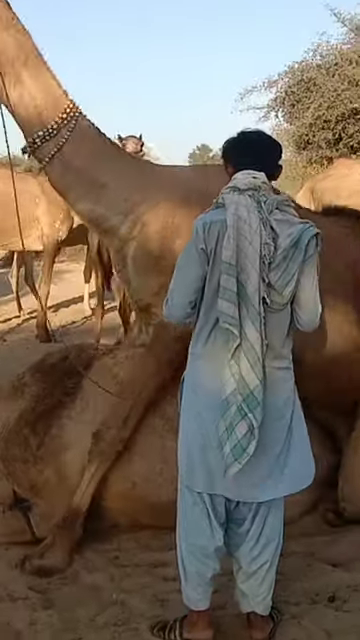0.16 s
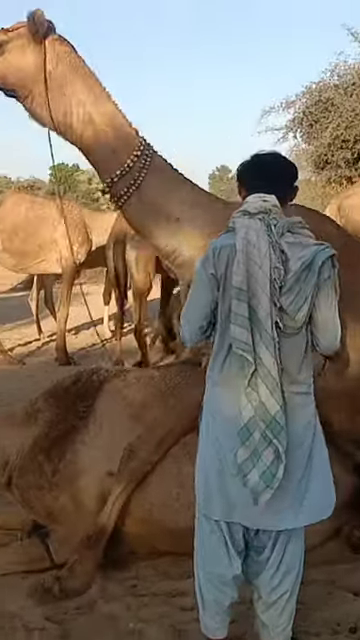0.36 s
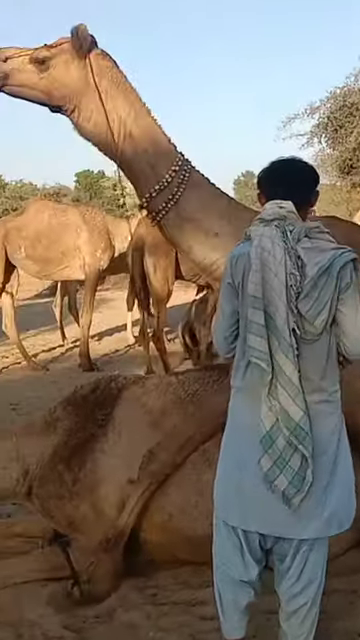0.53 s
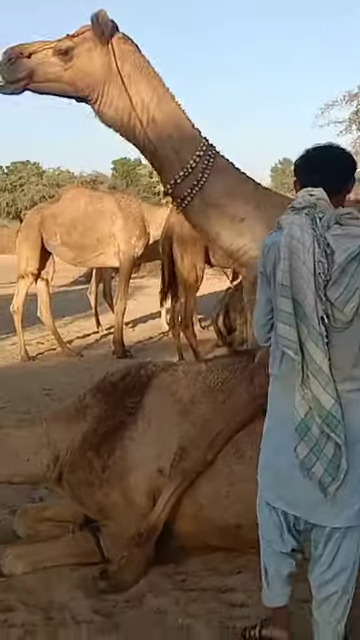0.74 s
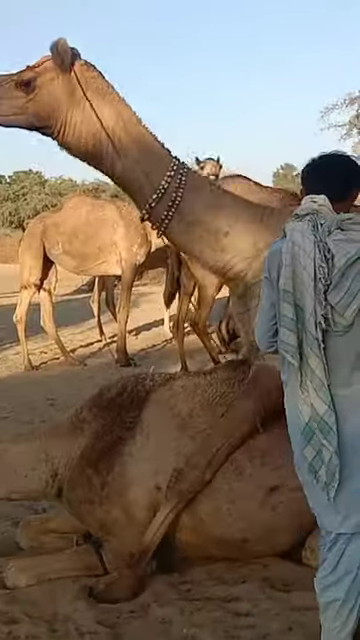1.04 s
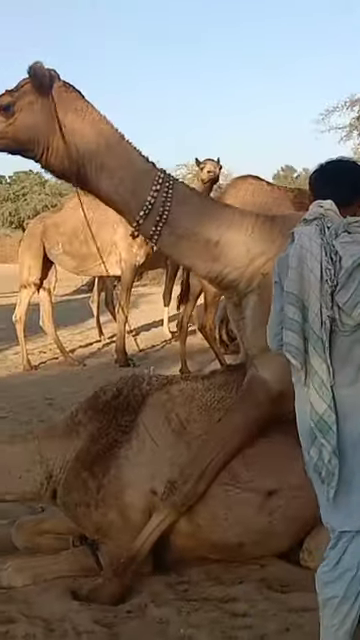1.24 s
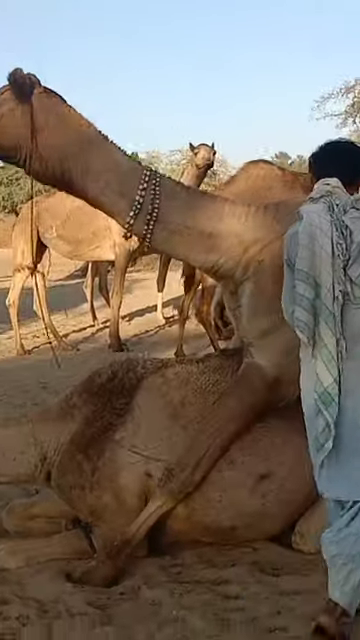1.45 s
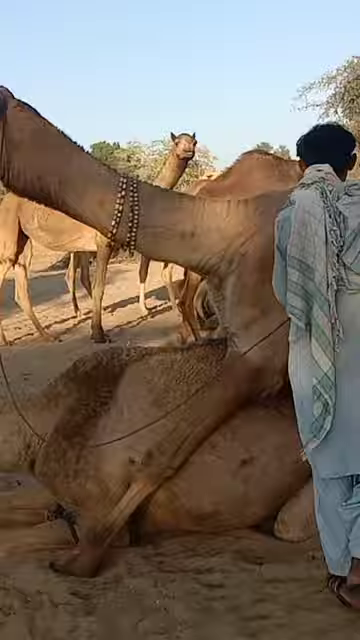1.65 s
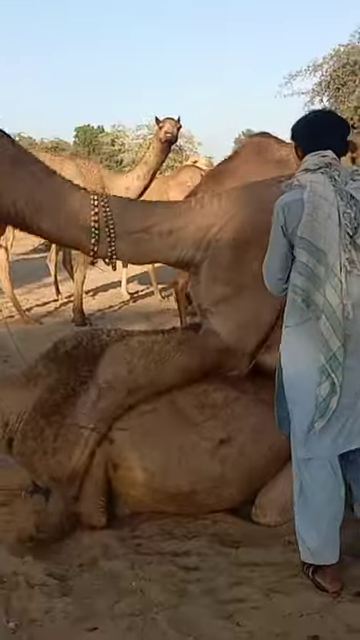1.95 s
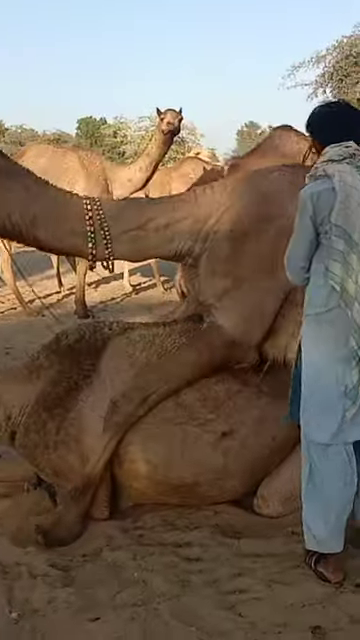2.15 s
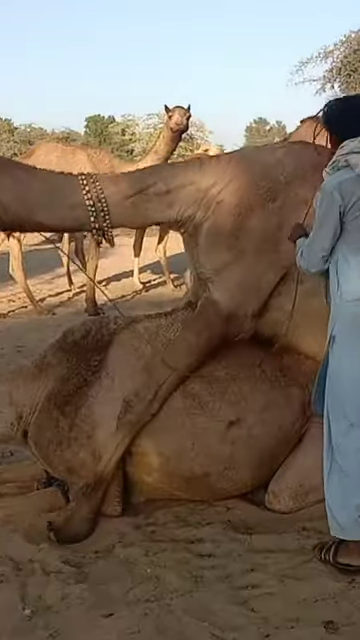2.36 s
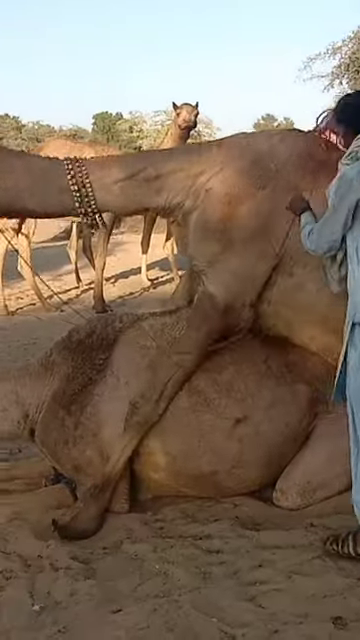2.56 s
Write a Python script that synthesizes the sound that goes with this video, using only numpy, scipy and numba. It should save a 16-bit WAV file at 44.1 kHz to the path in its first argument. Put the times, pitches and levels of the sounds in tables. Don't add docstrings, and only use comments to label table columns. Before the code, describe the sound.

One long, hoarse camel groan, low and unevenly pulsing, grows slower and raspier before cutting off, with small bead knocks near the end. Close phone pickup outdoors, almost silent background, hardly any echo.

```python
import sys
import numpy as np
from scipy import signal
from scipy.io import wavfile
from scipy.ndimage import uniform_filter1d, minimum_filter1d
from numba import njit

SR = 44100
rng = np.random.default_rng(int(sys.argv[2]) if len(sys.argv) > 2 else 0)


def how_loud(loudness_db):
    steps = np.asarray(loudness_db, float) / 20
    return 10 ** steps


def file_out(sig):
    cols = np.atleast_2d(sig).T
    lim = np.clip(cols, -1, 1)
    pcm = np.round(lim * 32767).astype(np.int16)
    wavfile.write(sys.argv[1], SR, pcm)


N = 119070

# start_s, level_db, pulse_hz, first_hz, second_hz, third_hz (throat resonances)
BELLOW_PATH = [(0.195, -40, 106, 242, 866, 1610), (0.21, -32, 105, 247, 854, 1550),
               (0.33, -18, 108, 282, 936, 1520), (0.57, -20, 106, 301, 958, 1610),
               (0.81, -17, 104, 305, 936, 1630), (0.86, -25, 104, 278, 924, 1560),
               (0.92, -19, 107, 293, 917, 1490), (1.03, -18, 93.2, 278, 945, 1430),
               (1.19, -20, 92.7, 267, 953, 1610), (1.29, -21, 109, 268, 922, 1530),
               (1.54, -18, 106, 283, 908, 1550), (1.64, -20, 97.1, 277, 919, 1510),
               (1.88, -18, 97.0, 276, 913, 1480), (2.03, -20, 86.5, 272, 886, 1460),
               (2.22, -17, 93.3, 284, 941, 1500), (2.4, -20, 87.6, 274, 874, 1500),
               (2.44, -26, 86.8, 252, 800, 1450), (2.53, -72, 86.5, 252, 897, 1430)]
BELLOW_END_S = 2.445


@njit
def svf(x, hz, width):
    y, band, low = np.empty(len(x)), 0., 0.
    for i in range(len(x)):
        g, k = np.tan(np.pi * hz[i] / SR), width / hz[i]
        v = (band + g * (x[i] - low)) / (1 + g * (g + k))
        band, low, y[i] = 2 * v - band, low + 2 * g * v, k * v
    return y


def steep(x, hz, width, count=2):
    for _ in range(count):
        x = svf(x + 1e-18, hz + np.zeros(N), 1. * width)
    return x


def unit(x):
    return x / np.sqrt(np.mean(x ** 2))


def smooth(x, size):
    return uniform_filter1d(uniform_filter1d(x, size), size)


def walk(rate_hz):
    hold = int(SR / rate_hz)
    return 1.3 * smooth(rng.standard_normal(400)[np.arange(N) // hold], hold)


def clicks(times, sizes):
    at = np.asarray(times) * SR
    i = at.astype(int)
    early = np.bincount(i, sizes * (1 - at + i), N + 1)[:N]
    late = np.bincount(i + 1, sizes * (at - i), N + 1)[:N]
    return early + late


def follow(t, table):
    table = np.array(table)
    return [np.interp(t, table[:, 0], column) for column in table.T[1:]]


def floor(t):
    # band_hz, level_db (per Hz)
    air_colour = [
        (24, -49),
        (40, -15.5),
        (186, 3.5),
        (346, -14.5),
        (866, 1.5),
        (3220, -7),
        (4930, -14),
        (12300, -23),
        (15000, -25),
    ]
    colour_hz, colour_db = np.transpose(air_colour)
    air = 0
    for hz in 60 * 2 ** np.arange(0, 8, .5):
        db = np.interp(np.log(hz), np.log(colour_hz), colour_db) + 3.5 * walk(20)
        air = air + how_loud(db) * steep(rng.standard_normal(N), hz, hz / 3)
    hum = unit(steep(rng.standard_normal(N), 75, 40)) * how_loud(-61) * (t < .3)
    return unit(air) * how_loud(-77.5) + hum


def beads(t):
    # start_s, peak_db, pitch_hz
    tinkles = [
        (.04, -66, 2800),
        (.02, -68, 1260),
        (1.32, -67, 4750),
        (1.615, -46, 3300),
        (1.615, -44, 4600),
        (2.34, -40, 4650),
        (2.432, -35.5, 3100),
        (2.463, -42.5, 2800),
        (2.5, -61, 2800),
        (2.53, -67.5, 1380),
    ]
    t60_s, attack_s = .055, .004
    out = 0
    for start_s, peak_db, hz in tinkles:
        age = np.maximum(t - start_s, 0)
        envelope = how_loud(peak_db - 60 * age / t60_s) * (1 - np.exp(-age / attack_s))
        out = out + envelope * np.sin(2 * np.pi * hz * age)
    return out


def rumble():
    # start_s, peak_db
    pulses = [
        (0.064, -62),
        (0.086, -59),
        (0.111, -51.5),
        (0.136, -42.5),
        (0.164, -52),
        (0.185, -39.5),
    ]
    start_s, peak_db = np.transpose(pulses)
    muffled = steep(clicks(start_s, how_loud(peak_db)), 240, 140, count=4)
    return muffled * how_loud(peak_db.max()) / np.abs(muffled).max()


def folds():
    # start_s, peak_db
    early_slaps = [(0.211, -24), (0.23, -21), (0.252, -16), (0.27, -13), (0.288, -11), (0.306, -11),
                   (0.325, -6), (0.353, -6), (0.37, -6), (0.39, -7), (0.425, -4), (0.454, -8), (0.475, -9),
                   (0.502, -13), (0.502, -7), (0.521, -11), (0.539, -9), (0.568, -11), (0.578, -10),
                   (0.586, -8), (0.606, -7), (0.624, -9), (0.661, -7), (0.672, -7), (0.7, -8), (0.738, -10),
                   (0.756, -7), (0.768, -7), (0.775, -5), (0.795, -5), (0.814, -6), (0.854, -15),
                   (0.885, -8), (0.912, -14), (0.92, -12), (0.947, -4), (0.986, -7), (1.007, -8),
                   (1.028, -8), (1.049, -12), (1.06, -9), (1.071, -8), (1.125, -12), (1.138, -9),
                   (1.172, -10), (1.182, -11), (1.207, -11), (1.214, -10), (1.224, -11), (1.236, -10),
                   (1.263, -10), (1.275, -10), (1.298, -6), (1.324, -11), (1.352, -12), (1.38, -5)]
    # start_s, peak_db
    late_slaps = [(1.354, -14), (1.38, -5), (1.408, -6), (1.443, -7), (1.455, -7), (1.476, -8), (1.493, -6),
                  (1.514, -6), (1.541, -6), (1.587, -8), (1.605, -9), (1.627, -9), (1.627, -7),
                  (1.659, -10), (1.659, -8), (1.692, -4), (1.71, -7), (1.738, -10), (1.762, -8),
                  (1.781, -5), (1.803, -10), (1.834, -19), (1.834, -5), (1.852, -8), (1.875, -7),
                  (1.893, -5), (1.923, -9), (1.949, -5), (1.97, -13), (1.981, -10), (2.004, -10),
                  (2.027, -10), (2.066, -6), (2.083, -8), (2.098, -5), (2.126, -9), (2.144, -4),
                  (2.176, -9), (2.176, -6), (2.185, -4), (2.214, -7), (2.248, -4), (2.271, -8), (2.285, -8),
                  (2.31, -6), (2.373, -7), (2.384, -7), (2.406, -12), (2.43, -16)]
    jitter, shimmer_db, catch_db = .2, 2.6, -3
    slap_ref_db, slap_boost_db, slap_share, slap_fade_s = 11, 4.5, .95, .005
    throat_lead_s, scatter_s = .0008, .0003
    slaps = sorted([(.201, -34)] + list(early_slaps) + list(late_slaps))
    ends = [s for s, _ in slaps[1:]] + [BELLOW_END_S]
    chance = rng.standard_normal((len(slaps), 2, 24))
    times, dbs = [], []
    for (start, peak_db), end, (jit, shim) in zip(slaps, ends, chance):
        gap = end - start
        if gap < .004:
            continue
        level_db, pulse_hz = follow(start, BELLOW_PATH)[:2]
        over_db = peak_db - slap_ref_db - level_db
        n = int(np.clip(round(gap * pulse_hz), 1, 24))
        k = np.arange(n)
        after = (k + jitter * jit[:n] * (k > 0)) * gap / n
        slap_db = (slap_boost_db + slap_share * over_db) * np.exp(-after / slap_fade_s)
        uneven_db = (shimmer_db * shim[:n] + catch_db * (k == n - 1)) * (k > 0)
        times.append(start + after - throat_lead_s + scatter_s * jit[0])
        dbs.append(slap_db + uneven_db)
    return np.concatenate(times), np.concatenate(dbs)


def breath(t, hard):
    puff = signal.lfilter([1], [1, -np.exp(-1 / (.006 * SR))], hard)
    leak = (.45 + (t > BELLOW_END_S)) * puff.mean()
    return unit((puff + leak) * rng.standard_normal(N))


def lower_throat(t, hard, even, air, resonances_hz, third_db, second_up_db, closing):
    SECOND_UP = 1.08
    moving = [
        (0, 1, 30, -1.5),
        (0, .7, 60, -14),
        (0, 1.55, 70, -19.5),
        (1, SECOND_UP, 100, -6),
        (1, .98, 72, 2),
        (1, .85, 90, -6),
        (1, 1.33, 110, -13),
        (2, .93, 140, -3.5),
        (2, 1.015, 130, -6),
        (2, 1.09, 140, -5.5),
    ]
    dying = np.clip((t - BELLOW_END_S) / .03, 0, 1)
    chest_db = -35 + 3.5 * walk(9) + 18 * dying
    voice = how_loud(chest_db) * unit(steep(hard + air, 100, 130))
    for which, ratio, width, db in moving:
        drive = hard + how_loud(-5) * air if which else even + how_loud(-14) * air
        hz = ratio * resonances_hz[which] * (1 + .008 * walk(25))
        skirt = (3.5, 5.5, 5.2)[which]
        ring = steep(svf(drive, hz, 1. * width), hz, skirt * width)
        gain_db = db + 1.2 * walk(30) - 9 * closing * (0, 1.2, .5)[which]
        gain_db = gain_db + 7 * dying * (which == 0) + third_db * (which == 2)
        gain_db = gain_db + second_up_db * (ratio == SECOND_UP)
        voice = voice + how_loud(gain_db) * unit(ring) * np.sqrt(width / 150)
    voice = voice - .8 * steep(voice, 575, 170, count=1)
    edge = signal.ellip(4, 1, 30, 1740, fs=SR, output="sos")
    top = signal.butter(6, 2300, fs=SR, output="sos")
    return signal.sosfilt(np.vstack([edge, top]), voice)


def upper_throat(hard, air, opening, hiss_db, fourth_db, closing):
    # pitch_hz, width_hz, level_db, open_db (gained with the mouth open), hiss_share, patchy_db
    upper = [(2020, 250, -33, 3, 0, 2), (2400, 350, -28, -1, 0, 2), (2730, 280, -35, -1, 0, 2.5),
             (3120, 350, -56, 13, .8, 4), (3700, 650, -64, 25, 0, 2.5), (4200, 450, -71, 22, .2, 4),
             (4650, 400, -60, 15, .5, 5.5), (5150, 400, -59, 7, .9, 5.5), (5700, 450, -55, 1.5, 1.2, 5.5),
             (6250, 400, -58, 3, .9, 5.5), (6800, 400, -64, 8, .5, 5.5), (8200, 2600, -83, 12, .2, 4),
             (10500, 3000, -84, 7, .3, 5), (12300, 3500, -86, 11, .3, 5), (14500, 3000, -92, 11, .3, 3)]
    voice = 0
    for hz, width, db, open_db, hiss_share, patchy_db in upper:
        gain_db = 1.8 + db + open_db * opening + hiss_share * hiss_db - 9 * closing / 2
        gain_db = gain_db + fourth_db * (hz < 3000) + patchy_db * walk(25 + hz / 200)
        spittle = unit(rng.standard_normal(N)) * (hz > 3000) * (.6 if hz > 7500 else 1)
        drive = hard + how_loud(10 * np.log2(hz / 2500)) * (air + spittle)
        ring = steep(drive, hz * (1 + .022 * walk(14)), width, count=4)
        voice = voice + how_loud(gain_db) * unit(ring) * np.sqrt(width / 150)
    return voice


def camel(t):
    # start_s, opening (0-1), hiss_db, fourth_db, third_db (resonances), second_up_db (upper side of the second)
    mouth_path = [(.2, .05, -5, 2, -3.5, .1), (.3, .1, 3, 2, -1.5, 3.), (.5, .1, -1, 1, .1, 3.),
                  (.68, .3, 7, 2, .1, 3.), (.82, .1, 1, 1, -2., 2.5), (.95, .05, -2, -1, -1.5, 2.5),
                  (1.08, .05, -4, -1, -1.5, 2.5), (1.2, .05, -6, -2, -2., 1.5), (1.33, .3, 2, 1, .1, .1),
                  (1.55, .25, -2, -3, 1.5, .6), (1.67, .6, -2, -5, .1, .6), (1.8, .9, -1, -9, .1, -1.5),
                  (2.03, 1.05, -3, -4, .1, -2.5), (2.14, .9, 1, 1, 1.5, .1), (2.25, .85, 5, 2, 1.5, -1.5),
                  (2.38, .8, 3, 1, 2.5, -1.5), (2.5, .8, 1, 1, .1, .1)]
    level_db, _, *resonances_hz = follow(t, BELLOW_PATH)
    opening, hiss_db, fourth_db, third_db, second_up_db = follow(t, mouth_path)
    closing = np.clip((t - BELLOW_END_S + .09) / .1, 0, 1) + np.clip((.33 - t) / .2, 0, 1)
    times, dbs = folds()
    hard = unit(clicks(times, how_loud(dbs)))
    even = unit(clicks(times, how_loud(.25 * dbs)))
    air = breath(t, hard)
    voice = lower_throat(t, hard, even, air, resonances_hz, third_db, second_up_db, closing)
    voice = voice + upper_throat(hard, air, opening, hiss_db, fourth_db, closing)
    first_s, last_s = BELLOW_PATH[0][0], BELLOW_PATH[-1][0]
    on = np.clip((t - first_s) / .01, 0, 1) * np.clip((last_s + .01 - t) / .01, 0, 1)
    power = smooth(voice ** 2, int(.09 * SR))
    return voice / np.sqrt(power + .05 * power.mean()) * how_loud(level_db + .6) * on


def tick():
    one = steep(clicks([.4155], np.ones(1)), 12000, 5000)
    return one * how_loud(-56) / np.abs(one).max()


def scatter(near, t):
    age = t[:6000]
    tail = rng.standard_normal(6000) * how_loud(-60 * age / .1) * (age > .004)
    return how_loud(-20) * signal.fftconvolve(near, tail / np.sqrt(np.sum(tail ** 2)))[:N]


def scene():
    t = np.arange(N) / SR
    near = camel(t) + rumble()
    return (near + scatter(near, t) + beads(t) + tick() + floor(t))[None]


def band_limit(x):
    return signal.sosfilt(signal.butter(12, 16130, fs=SR, output="sos"), x)


def record(dry):
    limit_db, limit_s = -4.6, .006
    k = int(limit_s * SR)
    gain = np.minimum(1, how_loud(limit_db) / (np.abs(dry) + 1e-9))
    gain = smooth(minimum_filter1d(gain, 2 * k), k)
    return band_limit(dry * gain)


dry = scene()
out = record(dry)
file_out(out)
```